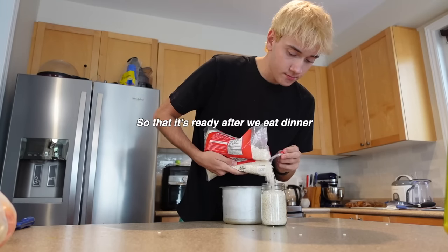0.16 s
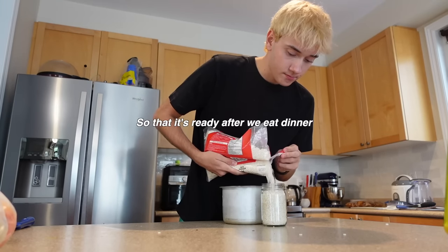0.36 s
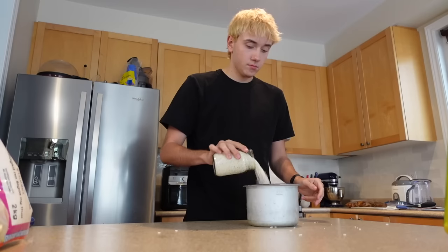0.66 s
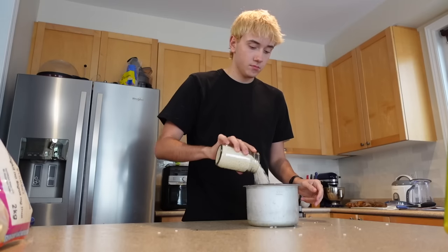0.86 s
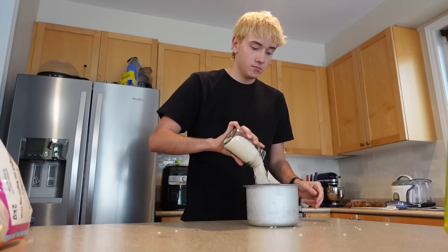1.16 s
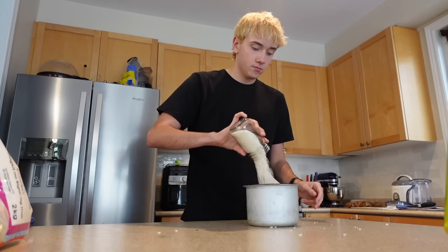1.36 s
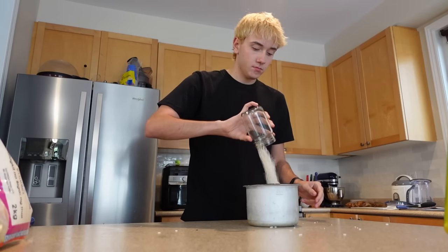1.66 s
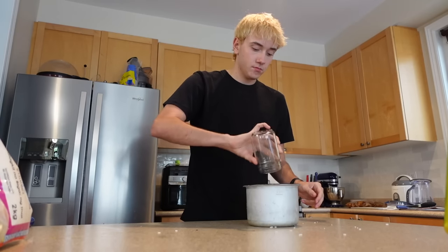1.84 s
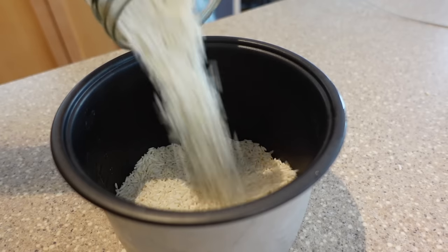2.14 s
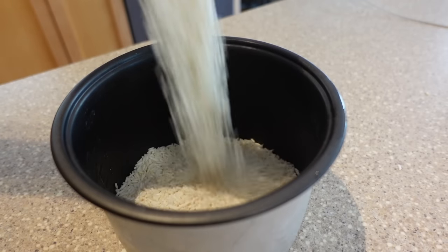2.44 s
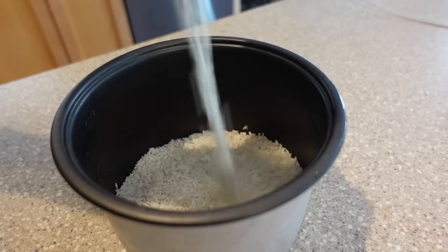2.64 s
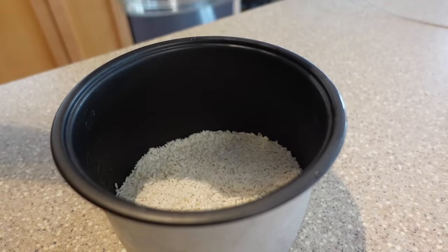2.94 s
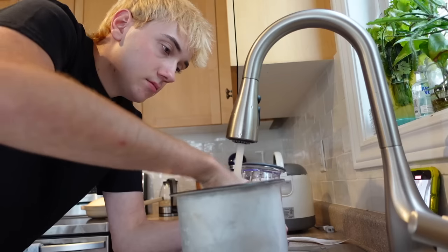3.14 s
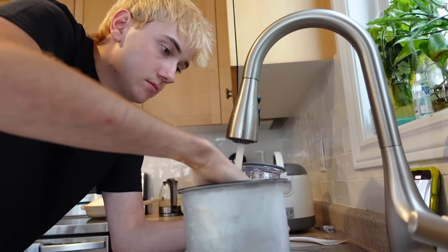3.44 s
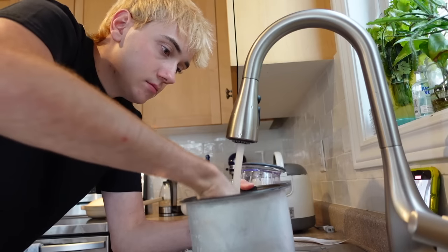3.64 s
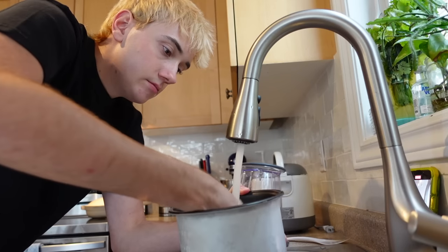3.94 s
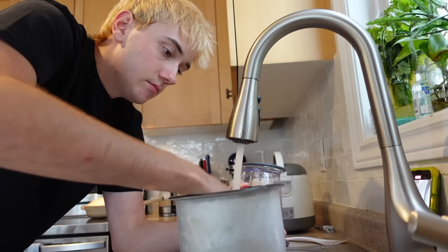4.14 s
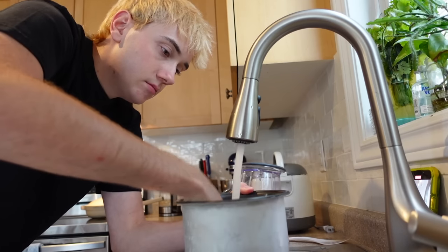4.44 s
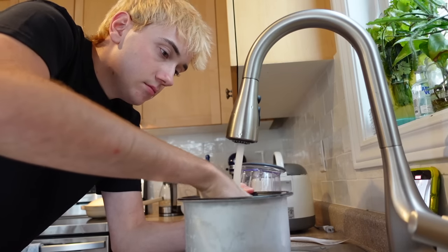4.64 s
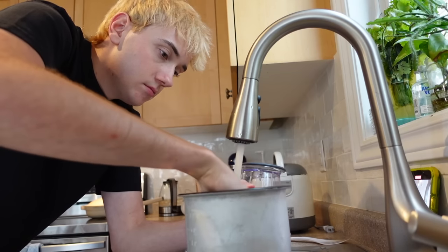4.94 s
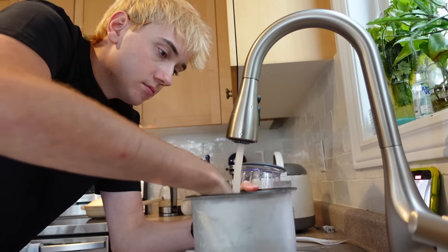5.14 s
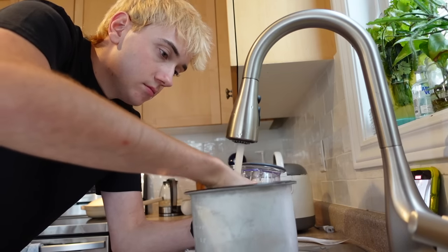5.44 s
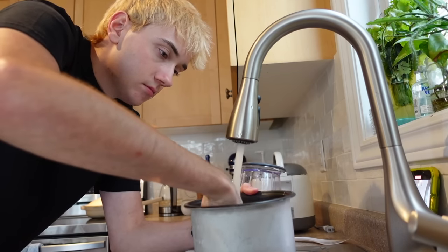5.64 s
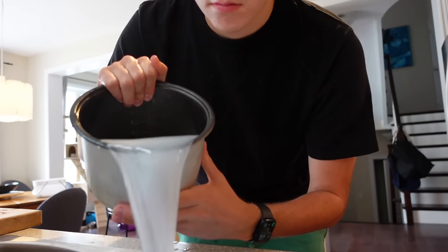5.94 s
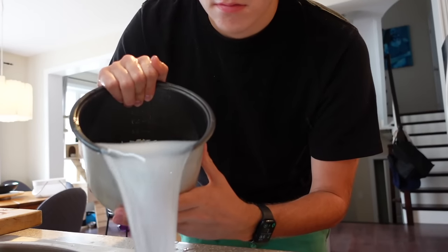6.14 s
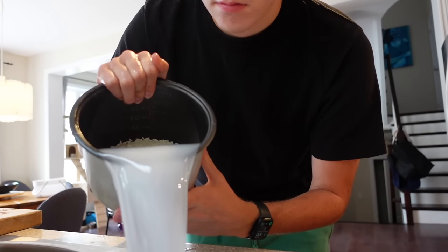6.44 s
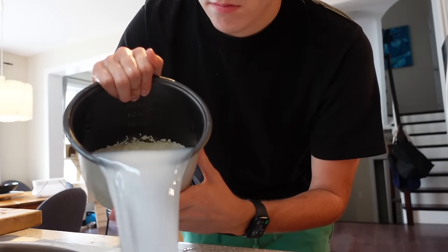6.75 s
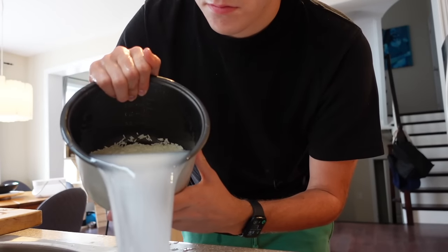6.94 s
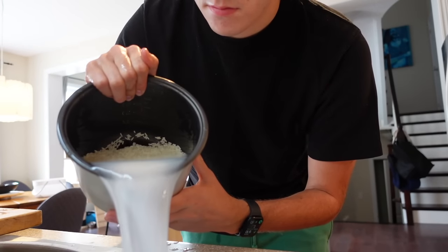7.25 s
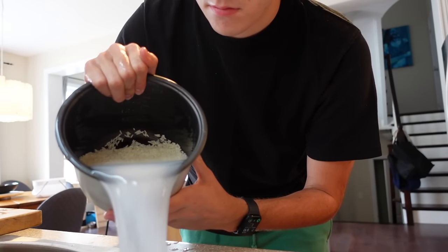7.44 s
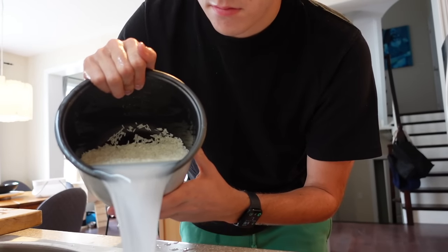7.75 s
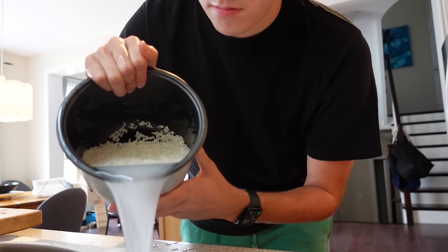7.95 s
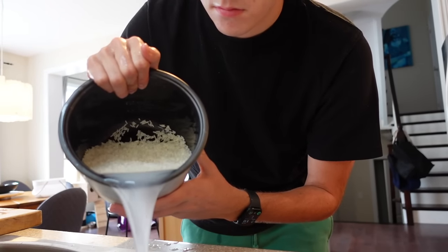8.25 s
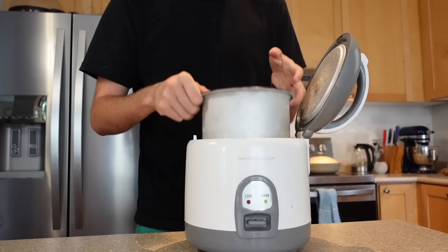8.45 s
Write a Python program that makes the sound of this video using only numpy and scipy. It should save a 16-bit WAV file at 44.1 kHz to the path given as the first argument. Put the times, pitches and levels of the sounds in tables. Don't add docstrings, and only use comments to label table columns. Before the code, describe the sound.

Dry grains tick and rattle into a pot, a steady airy tap rush follows, then bubbling water pours into a metal basin, ending with a faint scrape.

```python
import sys
import numpy as np
from scipy import signal
from scipy.fft import rfft, irfft
from scipy.io import wavfile
from scipy.ndimage import uniform_filter1d, minimum_filter1d

SR = 44100
rng = np.random.default_rng(int(sys.argv[2]) if len(sys.argv) > 2 else 0)


def volts(x):
    e = np.asarray(x, float) / 20
    return 10 ** e


def wrap_up_sound(samples):
    columns = np.atleast_2d(samples).T
    tamed = np.clip(columns, -1, 1)
    steps = np.round(tamed * 32767).astype(np.int16)
    wavfile.write(sys.argv[1], SR, steps)


N = 378819
SWAY = .012


def unit(x):
    return x / np.sqrt(np.mean(x ** 2) + 1e-18)


def body(x, colour, ring=(), bed_db=0):
    size = 8192
    hz = np.arange(size // 2 + 1) * SR / size + 1
    colour_hz, colour_db = np.transpose(colour)
    power = volts(2 * (np.interp(np.log(hz), np.log(colour_hz), colour_db) + bed_db))
    power = power * np.minimum(hz / colour_hz[0], 1) ** 4
    for f, width, db in ring:
        power = power + volts(2 * db) / (1 + (2 * (hz - f) / width) ** 2) ** 2
    cep = irfft(np.log(power) / 2)
    cep[1:size // 2] *= 2
    response = irfft(np.exp(rfft(cep[:size // 2], size)))[:size // 2]
    return signal.oaconvolve(x, response)[:len(x)]


def swaying_body(x, share, colour, ring, bed_db, shifts):
    out = 0
    for shift, mix in zip(shifts, [share, 1 - share]):
        moved = [(f * (1 + shift), width, db) for f, width, db in ring]
        out = out + body(x * mix, colour, moved, bed_db)
    return out


def above(x, hz):
    return signal.sosfilt(signal.butter(4, hz, "high", fs=SR, output="sos"), x)


def grains(t, rate, spread_db):
    chance, sign, size = rng.random((len(t), 3)).T
    clicks = (chance < rate / SR) * np.sign(sign - .5) * volts(-spread_db * np.log(size + 0.019))
    return clicks * rng.standard_normal(len(t))


def walk(t, rate, depth_db):
    k = int(SR / rate) + 1
    steps = np.repeat(rng.standard_normal(len(t) // k + 1), k)
    return volts(depth_db * 1.08 * uniform_filter1d(steps, k)[:len(t)])


def curves(t, table):
    s, *columns = np.transpose(table)
    return [np.interp(t, s, c) for c in columns]


def pings(t, rows, rise_s, glide, rough):
    out = np.zeros(len(t) + SR)
    shake = uniform_filter1d(rng.standard_normal(len(t) + SR), 8) * rough
    for s, db, hz, t60 in rows:
        u = np.arange(int(np.clip(t60, .004, .15) * SR)) / SR
        i = max(int((s - t[0]) * SR), 0)
        wobble = np.cumsum(shake[i:i + len(u)])
        ping = np.sin(2 * np.pi * hz * u * (1 + glide * u / u[-1]) + wobble)
        fade = (1 - np.exp(-u / rise_s)) ** 2 * 1000. ** (-u / u[-1])
        out[i:i + len(u)] += volts(db) * ping * fade
    return out[:len(t)]


def ringing(rows, cycles):
    return [(*r, cycles / r[2]) for r in rows]


def bursts(t, rows, fall_s):
    jumps = np.zeros(len(t))
    for r in rows:
        jumps[int(np.clip((r[0] - t[0]) * SR, 0, len(t) - 1))] += volts(r[1])
    return signal.lfilter([1], [1, -np.exp(-1 / (fall_s * SR))], jumps)


def bubbles(t, rate, lo_hz, hi_hz, cycles, spread_db):
    length_s = t[-1] - t[0]
    when, pitch, size = rng.random((int(rate * length_s), 3)).T
    hz = lo_hz * (hi_hz / lo_hz) ** pitch
    return np.transpose([t[0] + when * length_s, -spread_db * np.log(size + 0.002), hz, cycles / hz])


def brood(rows, within_s, drop_db, spread, cycles):
    u = rng.random((len(rows), 3, 3))
    s, db, hz = np.transpose(rows)[:, :, None]
    hz = hz * np.exp(spread * (2 * u[..., 2] - .5))
    young = [s + within_s * u[..., 0], db - drop_db * (.5 + u[..., 1]), hz, cycles / hz]
    return np.stack(young, axis=-1).reshape(-1, 4)


def spatter(t, rate, fall_s, spread_db):
    u = np.arange(int(.08 * SR)) / SR
    jumps = np.abs(grains(t, rate, spread_db))
    return unit(signal.oaconvolve(jumps, np.exp(-u / fall_s))[:len(t)])


# (frequency [Hz], level [dB])
FLOOR = [(40, -40), (90, -20), (200, -12), (450, -5), (800, -2.5), (1200, -5), (1600, -11), (4000, -13),
         (16000, -18)]
STILL = [(40, -32), (200, -17.5), (600, -6.5), (1130, -7.5), (1700, -12), (4000, -18.5), (15500, -22)]
NEAR = [(35, -29), (60, -14), (103, -28), (209, 0.5), (265, -9.5), (639, 2.5), (1230, -5.5), (1560, -3.5),
        (3400, -9), (4420, -23), (7480, -120)]
LAST = [(35, -54), (60, -18), (139, -14), (882, -10.5), (1410, -7), (2090, -16), (3040, -9), (4220, -13.5),
        (16000, -27)]
ROOM_DB = [-57, -54, -60.5, -58, -58.5, -46.5]
HUM_DB = [-81, -84, -80, -79, -68.5, -65]
# (start [s], end [s])
MASKED_S = (.576, 1.2)


def tone(t, shot):
    colour = [FLOOR, STILL, NEAR, NEAR, NEAR, LAST][shot]
    mid, side = (unit(body(rng.standard_normal(len(t)), colour)) * walk(t, 8, 1.5) for _ in range(2))
    hum = volts(HUM_DB[shot]) * np.sqrt(2) * np.sin(2 * np.pi * 118.4 * t)
    masked = uniform_filter1d(1. * (t > MASKED_S[0]) * (t < MASKED_S[1]), size=2000)
    noise = volts(ROOM_DB[shot] - 7 * masked) * (mid + volts(-19) * side * np.array([[1], [-1]]))
    return noise + hum * np.array([[.9], [1.1]])


WET_DB = [-10.5, -5.5, -11, -8.5, -8, -12]
SIDE_DB = [-16.5, -23.5, -19, -20.5, -12, -22]
# (frequency [Hz], level [dB])
SIDE_COLOUR = [
    [(100, -6), (600, 11), (1500, 6), (4000, -9), (12000, -7)],
    [(100, -6), (600, 0), (1500, -8), (4000, -2.5), (12000, -3)],
    [(100, -4), (600, -7), (1300, -15), (4400, -3), (15000, -6)],
    [(150, -12), (500, 13), (2400, -6.5), (6000, -1), (15000, -7.5)],
    [(250, -7), (700, 7), (2400, -5), (8000, -13.5), (15000, -13)],
    [(100, -6), (600, 6), (1500, 0), (4000, -8), (12000, -3)],
]


def room(x, shot):
    t60_s = 0.16
    u = np.arange(int(t60_s * SR)) / SR
    tails = rng.standard_normal((2, len(u))) * 1000. ** (-u / t60_s) * (u > .002)
    mid, side = (signal.oaconvolve(x, v / np.linalg.norm(v))[:len(x)] for v in tails)
    side = volts(SIDE_DB[shot]) * body(side, SIDE_COLOUR[shot])
    mid = x + volts(WET_DB[shot]) * mid
    return np.array([mid + side, mid - side])


# (frequency [Hz], level [dB])
BAG_COLOUR = [(180, -52), (300, -31), (485, -8), (664, -17), (895, -5), (1110, -12.5), (1760, -3.5),
              (4110, -12), (15700, -10.5)]
# (frequency [Hz], width [Hz], level [dB])
BAG_RING = [(8520, 150, -3.5)]


def bag(t):
    rice = unit(body(grains(t, 9000, 1.5), BAG_COLOUR, BAG_RING, -4.5))
    return volts(-47) * walk(t, 28.0, 0.73) * rice


# (frequency [Hz], level [dB])
BARE_COLOUR = [(1760, -25.5), (3000, -7), (3370, -11.5), (3850, -4.5), (5910, 0), (6430, -1), (8480, 1.5),
               (12200, 2.5), (15700, 1)]
HEAP_COLOUR = [(1760, -49), (3000, -15), (3400, -15), (4240, -1), (5560, -6), (6560, 2.5), (13400, 6),
               (15700, 3)]
# (frequency [Hz], width [Hz], level [dB])
BARE_RING = [(5990, 90, 9), (8480, 90, 8), (3950, 150, 0)]
HEAP_RING = [(3880, 24, -3), (4370, 91, -5.5), (4940, 25, -3), (5160, 45, 0), (5550, 32, -11),
             (6530, 180, -1.5), (6800, 37, -4), (7260, 99, 0), (7670, 45, 3), (8370, 83, 2), (8740, 35, -4),
             (9150, 100, -4)]
BURIED_RING = [(4270, 410, -5), (6300, 510, -7), (5070, 110, -2)]


def pour_ticks(t, rice, strength):
    covered_s, rings_die_s = 1.35, 1.6
    bare = 1 / (1 + np.exp((t - covered_s) / 0.018))
    free = 1 / (1 + np.exp((t - rings_die_s) / 0.082))
    metal = unit(body(rice, BARE_COLOUR, BARE_RING, 0))
    half_free = unit(body(rice[::-1], HEAP_COLOUR, HEAP_RING, -16))
    buried = unit(body(rice, HEAP_COLOUR, BURIED_RING, -12.5))
    heap = np.sqrt(free) * half_free + np.sqrt(1 - free) * buried
    return above(strength * (np.sqrt(bare) * metal + np.sqrt(1 - bare) * heap), 830)


# (time [s], level [dB])
POUR = [
    (0.735, -17.5),
    (0.9, -16),
    (1.161, -15.5),
    (1.32, -24),
    (1.48, -14.5),
    (1.694, -21.5),
    (1.8, -19),
    (1.907, -30),
    (2.02, -45),
]
# (time [s], peak level [dB])
FIRST = [
    (0.699, -12.5),
    (0.7115, -14),
    (0.719, -17),
    (0.7234, -21),
    (1.92, -24),
]
# (frequency [Hz], level [dB])
WALL_COLOUR = [(180, -86), (300, -60), (545, -14), (1180, -6), (1410, 1.5), (1870, -1), (2280, 4),
               (4000, -11), (5200, -30), (8800, -120)]
# (frequency [Hz], width [Hz], level [dB])
WALL_RING = [(1490, 130, -7), (1710, 19, -5), (2363, 41, -1)]


def pour(t):
    bare_db, climb_db_per_s, buried_db, buried_s = -19.5, 12, -24.5, 1.377
    tick_db, = curves(t, POUR)
    open_wall = 1 / (1 + np.exp((t - buried_s) / 0.026))
    climb_db = climb_db_per_s * (t - POUR[0][0])
    wall_db = tick_db + buried_db + open_wall * (bare_db - buried_db + climb_db)
    on = np.clip((t - .722) / 0.011, 0, 1)
    rice = grains(t, 16000, 0.86) * walk(t, 59.0, 0.78)
    first = bursts(t, FIRST, 0.0078) * volts(-12.0)
    ticks = pour_ticks(t, rice, on * volts(tick_db) + first)
    wall = unit(body(rice, WALL_COLOUR, WALL_RING, -11.0))
    wall_strength = on * volts(wall_db) + uniform_filter1d(first, size=130) * volts(-18.0)
    return ticks + above(wall_strength * wall, 380)


# (frequency [Hz], level [dB])
CLOSE_COLOUR = [(1760, -46), (3000, -35), (3900, -17), (4270, -11), (5520, -12.5), (6430, 2), (7030, -7),
                (8250, 0), (15700, 0)]
# (frequency [Hz], width [Hz], level [dB])
CLOSE_RING = [(4330, 180, 7), (5200, 150, -2.5), (6440, 230, 7.5), (8300, 380, 6.5), (10330, 430, 8),
              (11400, 530, 5)]
# (time [s], peak level [dB])
CLUMPS = [(2.14, -6), (2.162, 1), (2.207, -4), (2.237, -3), (2.277, -5), (2.3, 0), (2.3355, -5), (2.353, 2),
          (2.386, 2.5), (2.399, -4), (2.4332, 1), (2.461, -6), (2.477, -2), (2.4916, -5), (2.517, -1.5),
          (2.62, -5), (2.665, -10), (2.691, 1), (2.737, -9), (2.7718, -8), (2.7893, -3), (2.8172, -3),
          (2.826, -11.5), (2.92, -18.5), (2.964, -4.5), (2.965, -5), (2.865, -24)]
MORE_CLUMPS = [(2.194, -1), (2.311, 2), (2.32, -0.5), (2.468, 1), (2.5, -15), (2.546, -1), (2.56, -10),
               (2.585, -11), (2.638, -6), (2.648, -2), (2.705, -1), (2.7534, 0), (2.7624, -8), (2.8492, -27),
               (2.99, -16)]


def close_ticks(t, tick_db):
    rice = unit(grains(t, 9000, 3.0) * walk(t, 250, 2.5))
    lump_shape = uniform_filter1d(bursts(t, CLUMPS + MORE_CLUMPS, 0.0014), size=80, origin=-20)
    lumps = rng.standard_normal(len(t)) * lump_shape * volts(-6.0)
    gain = np.std(body(rice, CLOSE_COLOUR, CLOSE_RING, -2.5))
    share = 1 / (1 + walk(t, 30, 9))
    shifts = [0.86 * 2 * SWAY, -0.9 * 2 * SWAY]
    return swaying_body(rice * volts(tick_db) + lumps, share, CLOSE_COLOUR, CLOSE_RING, 1, shifts) / gain


# (frequency [Hz], width [Hz], level [dB])
JAR = [(2680, 180, -4.5), (8360, 250, -4.5), (5840, 150, -16)]
# (time [s], level [dB], frequency [Hz], ring time [s])
CHINK = [
    (2.864, -36, 2700, .09),
    (2.864, -23, 8500, .045),
    (2.864, -24, 5850, .013),
]


def jar_lip(t):
    empties_s, fade_db_per_s = 2.55, 150
    jar_db = -46 - fade_db_per_s * np.maximum(t - empties_s, 0)
    jar = unit(body(grains(t, 2500, 1.1), [(100, -65), (2000, -28.5), (16000, -19.0)], JAR))
    return volts(jar_db + 9.0) * jar + pings(t, CHINK, 0.0005, 0, .01)


def close_wall(t, tick_db):
    full_flow_db, follows, climb_db_per_s = -31.5, 1.8, 8.5
    wall_db = -51 + follows * np.minimum(tick_db - full_flow_db, 0) + climb_db_per_s * (t - t[0])
    colour = [(300, -41), (700, -19), (1500, 8), (2400, -1.5), (3600, -1.0), (5000, -44)]
    return volts(wall_db) * unit(body(grains(t, 9000, 1.7), colour))


# (time [s], level [dB])
CLOSE = [(2.03, -49), (2.13, -30.5), (2.142, -17.5), (2.33, -19.5), (2.37, -25.5), (2.5, -22.5),
         (2.624, -16), (2.72, -22.5), (2.85, -38), (2.96, -54), (2.975, -42), (3.088, -50)]


def close(t):
    tick_db, = curves(t, CLOSE)
    return close_ticks(t, tick_db) + jar_lip(t) + close_wall(t, tick_db)


# (frequency [Hz], level [dB])
TAP_COLOUR = [(880, -52), (1500, -5.5), (2100, -7), (3000, -4.5), (3490, 1.5), (7220, -1.5), (14900, -4),
              (15700, -3)]
# (frequency [Hz], width [Hz], level [dB])
TAP_RING = [(2670, 116, 4.5), (2400, 230, 0.5), (4070, 88, 0), (5140, 170, 4), (6190, 510, 3),
            (6900, 440, 3.5), (7440, 190, 7.5), (9180, 220, 2), (9950, 190, 4.5), (11440, 190, 3.5)]


def tap_fizz(t):
    fizz_db = -20.5 - 0.31 * (t - t[0])
    share = 1 / (1 + walk(t, 3.1, 6.9))
    jet = grains(t, 22000, 1.4) * walk(t, 39.62, 0.62)
    shifts = [0.71 * SWAY, -0.91 * SWAY]
    return volts(fizz_db) * unit(swaying_body(jet, share, TAP_COLOUR, TAP_RING, 0.56, shifts))


# (frequency [Hz], level [dB])
GURGLE = [(180, -91), (300, -19), (415, -44), (629, -10), (818, 0), (1670, 2), (2150, -16), (2600, -10),
          (3380, -6), (5720, -120)]
# (time [s], peak level [dB], frequency [Hz])
PLOPS = [(3.19, -21, 1620), (3.275, -22, 1500), (3.325, -24.5, 980), (4.127, -20.5, 1145),
         (4.205, -38, 657), (4.215, -23, 1430), (4.26, -31, 910), (4.475, -14.5, 1560), (4.83, -33, 805),
         (4.995, -33.5, 614), (5.5, -39, 605), (5.535, -28, 1500), (5.088, -20.5, 1600), (5.4, -38, 610),
         (5.582, -29, 1080)]


def tap_gurgle(t):
    gurgle_db = -38 + 0.44 * (t - t[0])
    swarm = unit(pings(t, bubbles(t, 500, 501, 2550, 32.0, 1.0), 0.00014, 0.046, 0.024))
    swell = 1 + volts(24) * uniform_filter1d(bursts(t, PLOPS, 0.011), size=220)
    gurgle = unit(body(grains(t, 9000, 0.88), GURGLE)) * swell + volts(-18.0) * swarm
    plop_rows = ringing(PLOPS, 24) + list(brood(PLOPS, .02, 8.9, 0.39, 21.6))
    plops = pings(t, plop_rows, 0.0016, 0.099, 0.028)
    return above(volts(gurgle_db - 3.0) * gurgle + volts(9.5) * plops, 290)


def tap(t):
    return tap_fizz(t) + tap_gurgle(t)


# (frequency [Hz], level [dB])
SINK_COLOUR = [(29, -62), (50, -17), (288, 7.5), (359, 6.5), (503, -2.5), (642, -36), (850, 0),
               (1040, -5.5), (1760, -19)]
# (frequency [Hz], width [Hz], level [dB])
SINK_RING = [(334, 50, -2), (624, 37, -1), (850, 43, 3.5)]
# (time [s], peak level [dB], frequency [Hz])
THUDS = [
    (5.868, -37.5, 290),
    (6.165, -41, 297),
    (6.266, -40, 310),
    (6.44, -42.5, 340),
    (6.905, -35.5, 385),
    (6.995, -36, 368),
    (7.131, -29.5, 646),
    (7.269, -28, 363),
    (7.568, -29.5, 359),
    (8.261, -38, 352),
]


def sink_drum(t):
    drum = volts(-50.5) + volts(-28) * bursts(t, THUDS, 0.068)
    sink = unit(body(grains(t, 2000, 0.43), SINK_COLOUR, SINK_RING, 0))
    sink = sink * drum * unit(2 + spatter(t, 37, 0.045, 0.42))
    thuds = pings(t, [(*r, .12) for r in THUDS], 0.00036, 0.045, 0.0031) * volts(0.5)
    return sink + thuds


POOL_FROM_S, POOL_S = 6.7, 0.077

# (frequency [Hz], level [dB])
SPRAY = [(1650, -20), (2800, -25), (3010, -8.5), (5760, 1), (7000, -1.5), (13300, -4), (15700, -7.5)]
MIST_HZ = [4000, 5500, 7500, 10500, 16500]
# (time [s], peak level [dB], frequency [Hz])
SPLATS = [(5.8963, -38, 6790), (5.9325, -28, 11600), (5.9916, -42, 4960), (6.028, -26.5, 5850),
          (6.1198, -24.5, 8360), (6.166, -19.5, 4170), (6.2734, -26, 12000), (6.3143, -9.5, 4790),
          (6.4144, -17, 4620), (6.447, -18, 5760), (6.527, -24, 6600), (6.571, -17, 7490),
          (6.665, -11.5, 9030), (6.7319, -30, 4330), (6.7853, -15.5, 4070), (6.8406, -12.5, 5960),
          (6.877, -13.5, 4600), (6.9127, -13, 4720), (6.9428, -6.5, 11640), (7.0924, -14, 3700),
          (7.126, -17, 5340), (7.138, -10.5, 5440), (7.164, -12, 5200), (7.2115, -16, 3830),
          (7.324, -16.5, 3840), (7.3744, -17, 6190), (7.3874, -11.5, 4300), (7.4308, -17, 3720),
          (7.5161, -19.5, 4950), (7.5336, -18, 3600), (7.5929, -18, 3450), (7.68, -15, 3300),
          (7.7102, -18, 5400), (7.7444, -19, 5730), (7.896, -9.5, 3550), (7.909, -25, 5000),
          (7.9312, -15.5, 4370), (7.987, -21, 4600), (8.011, -13.5, 5800), (8.018, -15, 3500),
          (8.04, -17, 4680), (8.0808, -18, 4070), (8.1297, -18, 4660), (8.1452, -13, 5830),
          (8.1696, -11.5, 8330), (8.2805, -17.5, 4600), (8.3452, -18.5, 7100), (8.362, -7.5, 4870),
          (8.428, -20, 3430)]
MORE_SPLATS = [(6.113, -24, 6000), (6.347, -19, 4900), (6.582, -23, 5100), (6.851, -14, 5250), (6.894, -11, 3760),
               (6.932, -8.5, 4340), (7.559, -18, 4600), (7.757, -14.5, 5700)]


def sink_spray(t, spray_db):
    drop_rows = SPLATS + MORE_SPLATS
    hiss = unit(body(grains(t, 12000, 2.6), SPRAY))
    below = [0]
    for hz in MIST_HZ:
        below.append(signal.sosfiltfilt(signal.butter(2, hz, fs=SR, output="sos"), hiss))
    shared = spatter(t, 120, .005, 1.5)
    patter = 0
    for low, high in zip(below, below[1:]):
        patter = patter + (high - low) * unit(.3 + .45 * shared + spatter(t, 190, .005, 1.7))
    spread_db = np.interp(t, [POOL_FROM_S - POOL_S, POOL_FROM_S + POOL_S], [-22, -29.5])
    sheet = volts(spread_db) * bursts(t, drop_rows, 0.02)
    crack = volts(-23) * bursts(t, drop_rows, 0.0012)
    spray = volts(spray_db) * unit(patter) + hiss * (crack + sheet)
    fizz = unit(pings(t, bubbles(t, 430, 2740, 11500, 45, 6.1), 0.0002, 0.055, 0.042))
    drops = pings(t, [(*r, .018) for r in drop_rows], 0.0009, 0.066, .19) * volts(3)
    return above(spray + volts(spray_db - 17.0) * fizz + drops, 1530)


# (frequency [Hz], level [dB])
SLOSH = [(350, -42), (600, -0.5), (760, -19), (1100, -2.5), (1330, -12), (1720, 1), (2680, 3), (4200, -1.5),
         (5460, -26), (9240, -120)]
# (time [s], level [dB], length [s])
SURGES = [
    (7.116, -25.5, 0.085),
    (7.412, -23, 0.048),
    (7.663, -28, 0.031),
    (8.017, -38, 0.009),
    (8.244, -33, 0.018),
]
# (time [s], peak level [dB], frequency [Hz])
BLOBS = [(6.05, -42, 1510), (6.315, -40, 1800), (6.3001, -28, 2720), (6.382, -23.5, 2640),
         (6.4203, -40, 2550), (6.445, -35, 1710), (6.4752, -22.5, 2800), (6.5011, -34, 1760),
         (6.531, -21.5, 3020), (6.5608, -19, 2740), (6.6019, -28, 2440), (6.6253, -23, 2920),
         (6.652, -22, 2400), (6.7226, -21, 3250), (6.758, -28, 2470), (6.776, -22, 2430),
         (6.802, -18.5, 2680), (6.8299, -18.5, 2500), (6.918, -26, 2030), (6.957, -17, 2860),
         (7.0265, -21, 2500), (7.1567, -15, 2700), (7.19, -4, 2700), (7.2285, -34, 2770),
         (7.2544, -27, 2160), (7.3512, -31, 2320), (7.3891, -21, 3260), (7.4181, -12.5, 2140),
         (7.428, -11.5, 2470), (7.46, -19, 2840), (7.506, -19, 2430), (7.536, -17, 3170),
         (7.598, -16, 2350), (7.657, -14.5, 2440), (7.682, -18, 2150), (7.7295, -18.5, 1766),
         (7.799, -19, 2380), (7.8267, -28, 2320), (7.867, -21, 2230), (7.897, -19, 2800),
         (7.9414, -25, 2870), (7.9903, -39, 3000), (8.019, -17, 2510), (8.041, -27, 2270),
         (8.071, -18, 2010), (8.1183, -17, 1780), (8.1674, -19, 2030), (8.2402, -22, 1960),
         (8.2517, -11, 2280), (8.428, -17.5, 2860)]
GLUGS = [(6.065, -41, 850), (6.268, -36, 823), (6.498, -34, 1450), (6.64, -22, 1510), (6.674, -19.5, 1120),
         (6.745, -24, 1490), (6.772, -27, 1590), (6.816, -24, 1560), (6.846, -23.5, 1060),
         (6.936, -31, 1540), (6.957, -19.5, 1275), (6.998, -31, 1520), (7.046, -17.5, 1540),
         (7.107, -21, 1610), (7.134, -30, 1540), (7.153, -23, 1370), (7.192, -15, 1440), (7.268, -34, 1280),
         (7.39, -22, 965), (7.392, -18, 1490), (7.523, -21, 1400), (7.539, -20, 1360), (7.57, -20, 1320),
         (7.636, -22, 1570), (7.684, -21, 1500), (7.731, -21, 1490), (7.788, -19, 1370), (7.87, -23, 1104),
         (7.895, -21, 1590), (7.954, -29, 1080), (8.026, -23, 980), (8.061, -29, 1010), (8.107, -27, 1210),
         (8.176, -21, 1110)]
# (time [s], level [dB], frequency [Hz], ring time [s])
GULP = (7.417, -13, 950, .08)


def sink_slosh(t, spray_db):
    shallow_db, deep_db, deepens_db_per_s = -10, -1, 5.5
    slosh_db = spray_db + np.interp(t, [POOL_FROM_S, POOL_FROM_S + POOL_S], [shallow_db, deep_db])
    slosh_db = slosh_db + deepens_db_per_s * np.maximum(t - POOL_FROM_S - POOL_S, 0)
    swarm = unit(pings(t, bubbles(t, 700, 997, 4520, 38.6, 3.6), 0.0001, 0.29, 0.077))
    wash = unit(body(grains(t, 8000, 1.5), SLOSH)) * unit(.6 + spatter(t, 120, .008, 1.6))
    surge = 0
    for s, db, length in SURGES:
        surge = surge + volts(db) * np.exp(-((t - s - length / 2) / length * 2) ** 2)
    slop = volts(-41) * np.exp((t[0] - t) / 0.016)
    slosh = surge * (volts(-8) * wash + volts(-6) * swarm)
    slosh = slosh + (volts(slosh_db - 5.5) + slop) * (wash + volts(-6) * swarm)
    slosh = slosh + volts(-24.0) * wash * uniform_filter1d(bursts(t, BLOBS, 0.005), size=200)
    blobs = pings(t, ringing(BLOBS, 70), 0.0008, 0.094, 0.06)
    blobs = blobs + pings(t, ringing(GLUGS, 50), 0.0012, 0.08, 0.03)
    blobs = blobs + pings(t, brood(GLUGS, 0.03, 4.8, 0.407, 42), 0.00068, 0.28, 0.016)
    blobs = blobs + pings(t, brood(BLOBS, 0.043, 4.4, 0.334, 61), 0.001, 0.24, 0.017)
    blobs = blobs + pings(t, [GULP], 0.001, 1.9, .06)
    return above(slosh + blobs, 620)


# (time [s], level [dB])
DRAIN = [(5.875, -61), (6.012, -66), (6.03, -42.5), (6.105, -46), (6.118, -38.5), (6.25, -36.5),
         (6.465, -33), (6.9, -31.5), (7.3, -29.5), (7.87, -35), (8.445, -36.5)]


def drain(t):
    spray_db, = curves(t, DRAIN)
    return sink_drum(t) + sink_spray(t, spray_db) + sink_slosh(t, spray_db)


# (time [s], level [dB])
RUB = [
    (8.46, -64),
    (8.5, -56),
    (8.54, -46),
    (8.57, -62),
    (8.6, -58),
]
# (frequency [Hz], width [Hz], level [dB])
RUB_RING = [(3030, 150, 4), (3950, 200, -5), (4900, 200, -3), (1400, 200, -8)]


def cooker(t):
    rub_db, = curves(t, RUB)
    colour = [(500, -30), (3000, -12), (15000, -25)]
    return volts(rub_db) * unit(body(grains(t, 3000, 2.0), colour, RUB_RING))


CUTS = [
    0,
    .576,
    2.025,
    3.094,
    5.864,
    8.449,
    8.6,
]


def scene():
    edges = np.minimum((np.array(CUTS) * SR).astype(int), N)
    shots = []
    for shot, source in enumerate([bag, pour, close, tap, drain, cooker]):
        t = np.arange(edges[shot], edges[shot + 1]) / SR
        shots.append(room(source(t), shot) + tone(t, shot))
    return np.concatenate(shots, axis=1)


def band_limit(x):
    return signal.sosfilt(signal.butter(12, 15840, fs=SR, output="sos"), x)


def record(dry):
    bass_cut = signal.butter(3, 90, "high", fs=SR, output="sos")
    top_cut = signal.ellip(10, .3, 45, 15740, fs=SR, output="sos")
    x = signal.sosfilt(np.vstack([bass_cut, top_cut]), dry)
    gain = np.minimum(1, .9 / (np.abs(x).max(axis=0) + 1e-9))
    smooth_gain = uniform_filter1d(minimum_filter1d(gain, size=89), size=45)
    return band_limit(x * smooth_gain)


dry = scene()
out = record(dry)
wrap_up_sound(out)
```